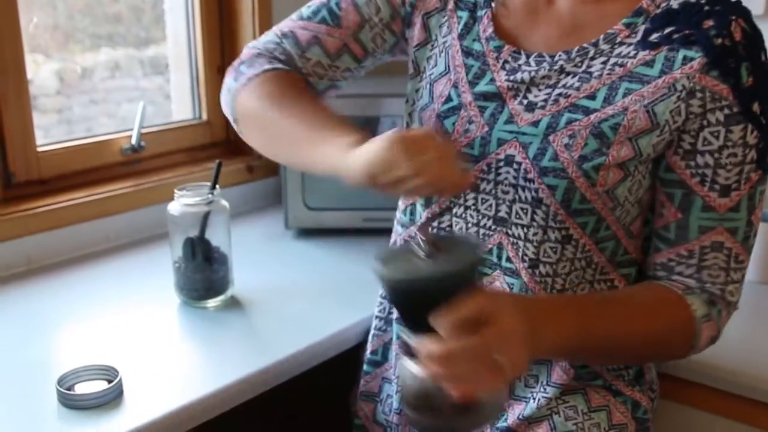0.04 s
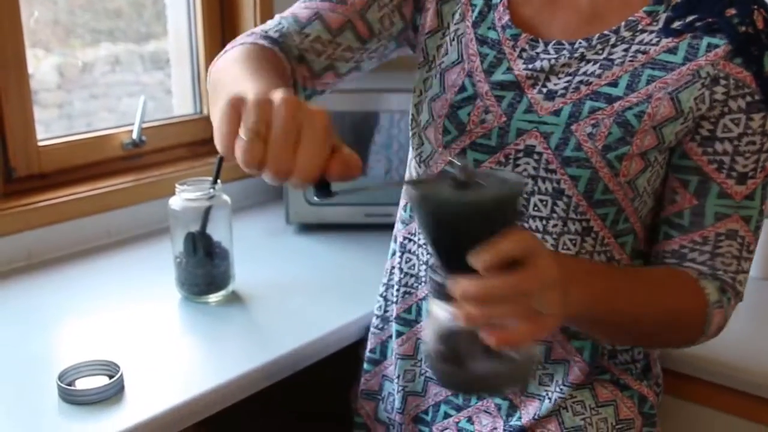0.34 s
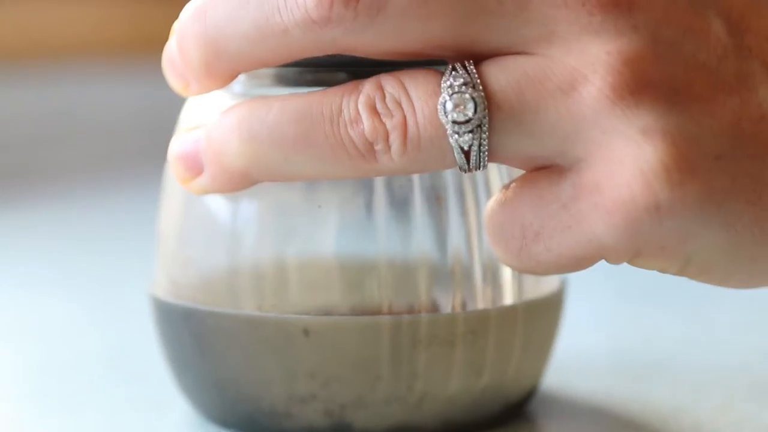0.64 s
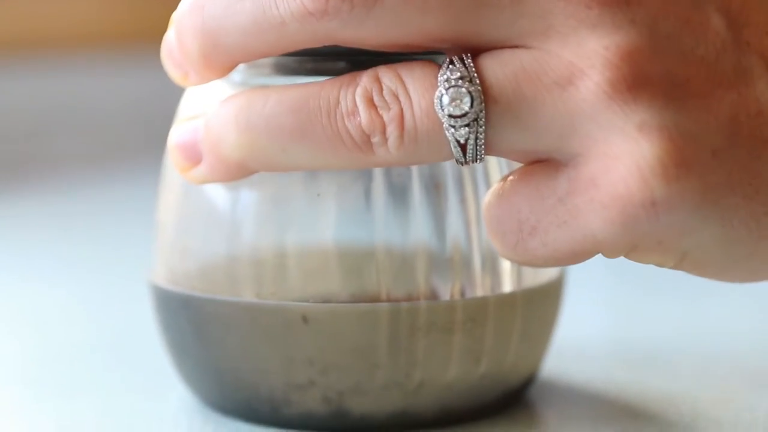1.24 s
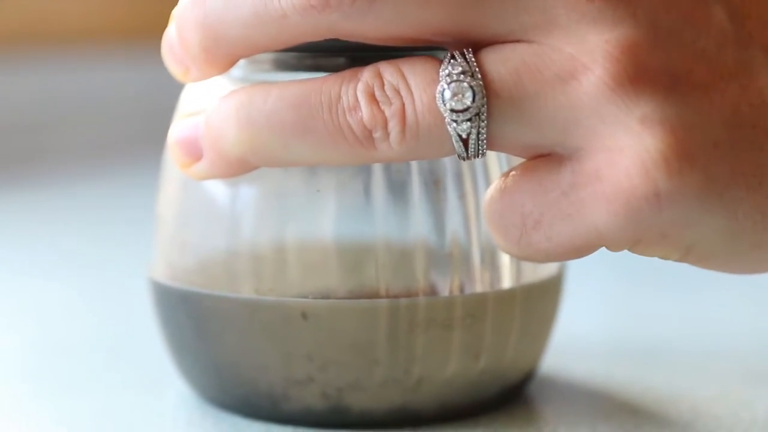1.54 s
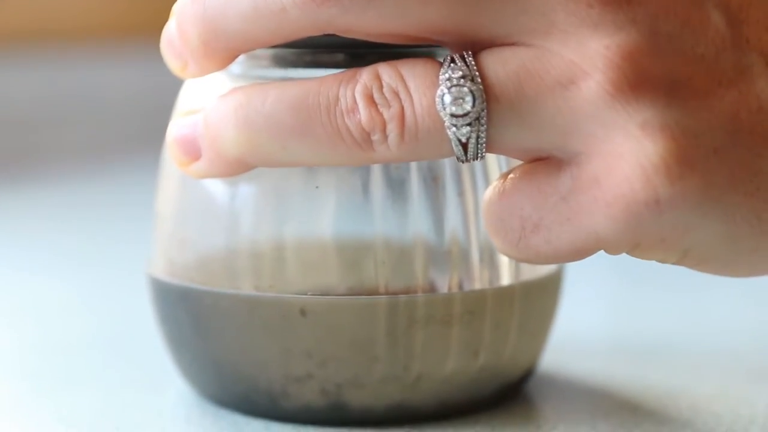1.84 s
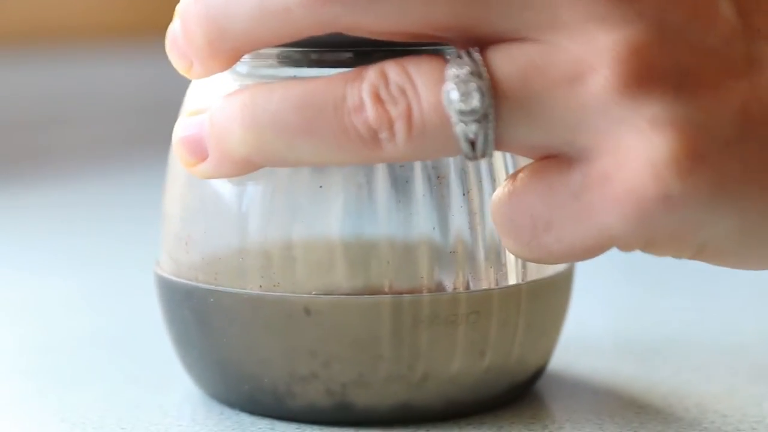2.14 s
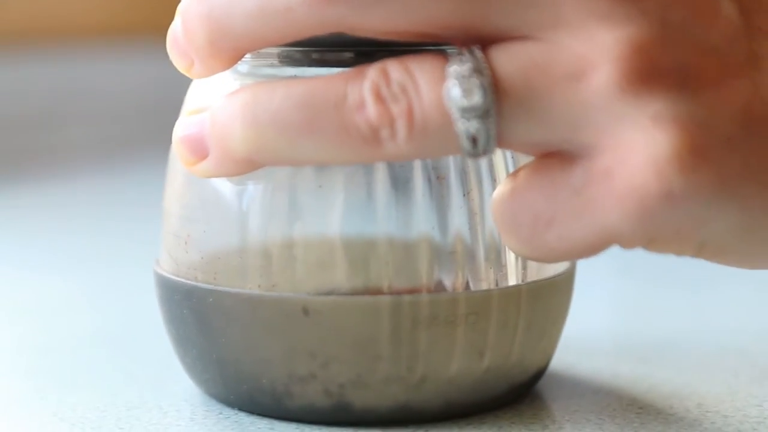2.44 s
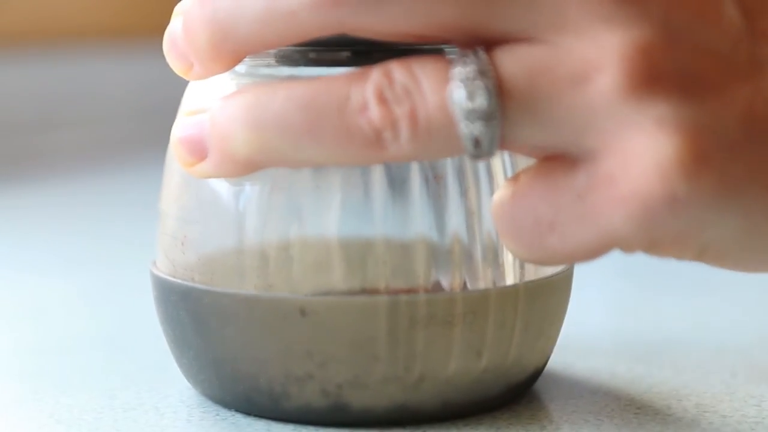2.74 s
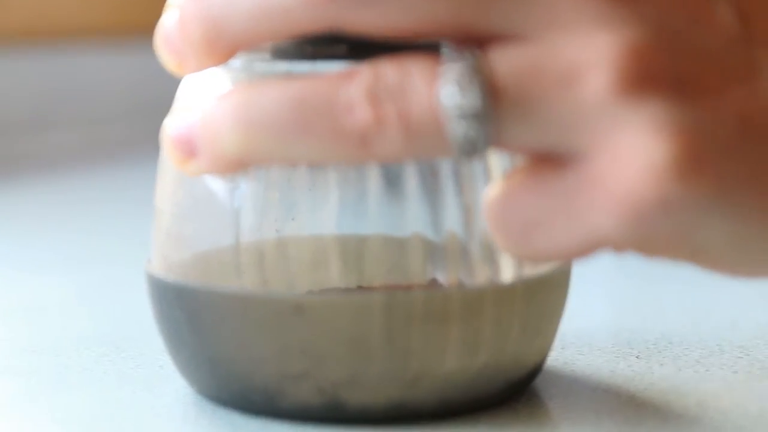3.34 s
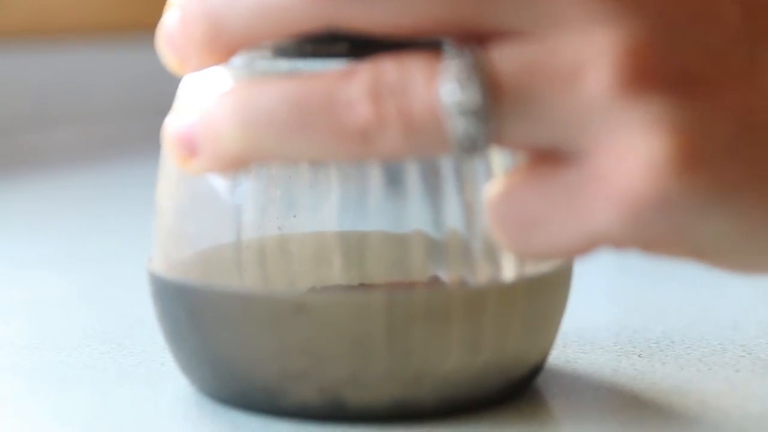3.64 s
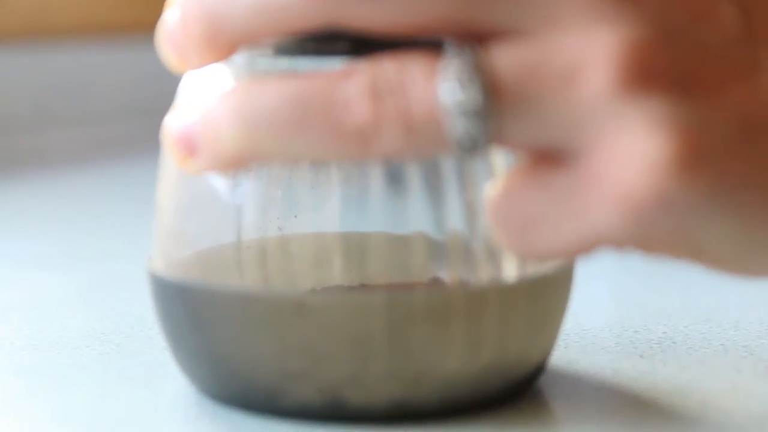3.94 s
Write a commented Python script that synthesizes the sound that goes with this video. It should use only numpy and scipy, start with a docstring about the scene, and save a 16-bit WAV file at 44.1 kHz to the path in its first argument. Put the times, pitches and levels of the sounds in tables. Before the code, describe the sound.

A hand-cranked coffee grinder rasps faintly across a kitchen, with grounds rustling brightly in a glass jar. After a brief silence at about 0.5 seconds, the grinding returns very close. Beans crunch and crack sharply over dull thuds of the crank, densest from 0.8 to 2.4 seconds. From about 2.7 seconds the crunching thins to scattered knocks, clicks and small scrapes of bean fragments until 4 seconds.

```python
"""A hand-cranked burr mill grinds coffee beans over a glass jar in a kitchen.
It is heard from across the room, with a bright rustle of grounds, then very close after a short silence.
Grit rasps between the burrs; beans crush and crack, ring the housing and spray splinters.
Fragments clink and scrape, the crank catches and thuds; the crunching thins as the beans run low."""
import sys
import numpy as np
from scipy import signal
from scipy.fft import rfft, irfft
from scipy.io import wavfile

SR = 44100
rng = np.random.default_rng(int(sys.argv[2]) if len(sys.argv) > 2 else 0)


def dump(signal):
    """Clip the signal to [-1, 1] and save it as 16-bit WAV at the path in sys.argv[1]."""
    limited = np.clip(np.atleast_2d(signal).T, -1, 1)
    pcm = np.round(limited * 32767).astype(np.int16)
    wavfile.write(sys.argv[1], SR, pcm)


N = 176400
TIME = np.arange(N) / SR
CLOSE_FROM_S, CUTOFF_HZ = 0.5596, 15750
GRIT_PER_S, FINE_GRAINS_PER_S, FRAGMENT_Q = 2100, 12000, 12


def from_db(db):
    """Decibels to gain."""
    return 10 ** (np.asarray(db) / 20)


def in_time(rows):
    """Columns of a curve at every sample."""
    times, *columns = np.transpose(rows)
    return [np.interp(TIME, times, column) for column in columns]


def coloured(x, points):
    """Minimum-phase filter of unit energy with the given spectrum."""
    size = 4096
    hz, db = np.transpose(points)
    shape_db = np.interp(np.log(np.fft.rfftfreq(size, 1 / SR) + 1), np.log(hz), db)
    cepstrum = irfft(np.log(from_db(shape_db)))[:size // 2]
    cepstrum[1:] *= 2
    impulse = irfft(np.exp(rfft(cepstrum, size)))
    return signal.fftconvolve(x, impulse[None] / np.linalg.norm(impulse), axes=-1)[:, :N]


def resonate(x, hz, width_hz):
    """One resonance of unit energy with steepened skirts."""
    radius = np.exp(-np.pi * width_hz / SR)
    peak = [1, 0, -1, 1, -2 * radius * np.cos(2 * np.pi * hz / SR), radius ** 2]
    octave_hz = [hz / np.sqrt(2), min(hz * np.sqrt(2), SR / 2 - 20)]
    sos = np.vstack([peak, signal.butter(2, octave_hz, "band", fs=SR, output="sos")])
    impulse = signal.sosfilt(sos, signal.unit_impulse(SR // 10))
    return signal.sosfilt(sos, x + 1e-18) / np.linalg.norm(impulse)


def grains(per_s, spread_db=3):
    """Random clicks, many small and a few large; rms 1."""
    hits = rng.random(N) < per_s / SR
    sizes = from_db(spread_db * np.minimum(rng.exponential(1, N), 3.5))
    clicks = hits * sizes * rng.choice([-1, 1], N)
    return clicks / clicks.std()


def contact(hz, scatter=1, stereo=1):
    """Strength of each click in each ear; the ears differ more in the treble."""
    width = min(stereo * 0.12 * hz / 1000, 1)
    mid, side = rng.standard_normal((2, N))
    return (1 + scatter * mid) / np.hypot(1, scatter) + width * side * [[1], [-1]]


def bursts(rows, release_s, attack_s=0.0013):
    """Sum of attack, hold, release envelopes."""
    return sum(from_db(db) * np.clip((TIME - start_s) / attack_s, 0, 1)
               * np.exp(-np.maximum(TIME - start_s - hold_s, 0) / release_s)
               for start_s, hold_s, db in rows)


def swell(peak_s, half_width_s):
    """Bell-shaped rise and fall in power."""
    return np.exp(-np.minimum(((TIME - peak_s) / half_width_s) ** 2, 100))


def drift(rate_hz):
    """Smooth random wandering of spread 1."""
    slow = signal.sosfilt(signal.butter(2, rate_hz, fs=SR, output="sos"), rng.standard_normal(N + SR))
    return slow[SR:] / slow[SR:].std()


# Distant mill envelope: (time [s], level [dB])
FAR_LEVEL = [(0, -30), (.074, -36.5), (.083, -26.5), (.11, -32.5), (.26, -36), (.33, -29.5), (.445, -39),
             (.47, -120)]
# Distant mill spectrum: (frequency [Hz], level [dB])
FAR_SPECTRUM = [(50, -58), (210, -23.5), (509, -17.5), (738, -1), (1450, -7.5), (1900, -5.5),
                (10700, -34.5), (15500, -61)]
def far_mill(grit):
    """Distant grinding, blurred by the room."""
    db, = in_time(FAR_LEVEL)
    side = signal.sosfilt(signal.butter(1, 3500, "high", fs=SR, output="sos"), rng.standard_normal(N))
    return from_db(db) * coloured(grit + side * [[1], [-1]], FAR_SPECTRUM)


# Crank catches: (time [s], hold [s], level [dB], pitch [Hz])
THUDS = [(0, 0.01, -43, 264), (0.665, 0.026, -32.5, 241), (0.823, 0.066, -41, 224),
         (0.997, 0.017, -38, 240), (1.179, 0.044, -36, 243), (1.356, .03, -43, 276),
         (1.817, 0.058, -41.5, 318), (2.079, 0.049, -39.5, 167), (2.294, 0.099, -39.5, 272),
         (3.261, 0.037, -45.5, 293)]
# Low mill resonances: (frequency [Hz], bandwidth [Hz], gain [dB])
LOW_MODES = [(154.3, 41, -13.5), (263.7, 16, -0.5), (318, 370, -4)]
def shudder(load, release_s=0.016, thud_width_hz=46, shake_db=3, rumble_db=-23.5):
    """Each catch of the crank thuds; catches and grinding load keep the whole mill rumbling."""
    rub = grains(FINE_GRAINS_PER_S)
    catches, out = np.zeros(N), np.zeros((2, N))
    for start_s, hold_s, db, hz in THUDS:
        catch = bursts([(start_s, hold_s, db)], release_s)
        out += resonate(rub * catch, hz, thud_width_hz)
        catches += catch
    shake = np.hypot(from_db(shake_db) * catches, from_db(rumble_db) * load)
    for hz, width_hz, db in LOW_MODES:
        out += from_db(db) * resonate(rub * shake * contact(hz), hz, width_hz)
    return out


# Slides of grounds: (time [s], hold [s], level [dB])
RUSTLES = [(.018, 0.043, -35), (.087, 0.0064, -34.5), (.198, 0.013, -41.5)]
# Rustle spectrum: (frequency [Hz], level [dB])
RUSTLE_SPECTRUM = [(2500, -40), (5500, 2), (10500, 0), (15500, -18)]
def rustle(grit):
    """Grounds slide in the glass jar."""
    hiss = coloured(grit * contact(hz=8040, stereo=0.75), RUSTLE_SPECTRUM)
    return bursts(RUSTLES, release_s=0.021) * hiss


# Burr drag: (time [s], level [dB], treble offset [dB])
DRAG = [(.57, -40.5, 7), (.65, -31.5, 1.5), (.87, -28, 1), (1.19, -24.5, -8.5), (1.29, -35.5, 7.5),
        (1.76, -32.5, -0.5), (2.03, -36, -2), (2.2, -28.5, 1.5), (2.42, -31.5, 5.5), (2.48, -40.5, -3),
        (2.56, -28, -3.5), (2.79, -43, -2), (3.25, -43, 9), (3.7, -49, -0.5), (4, -46.5, 2)]
def burr_drag():
    """Bass and treble envelopes of grit dragging between the burrs."""
    db, treble_db = in_time(DRAG)
    return from_db([db, db + treble_db]) * (TIME > CLOSE_FROM_S)


# Housing and jar resonances: (frequency [Hz], bandwidth [Hz], gain [dB])
BODY_MODES = [(678, 31, -15.5), (772, 186, -7.5), (968, 85, -4), (1244, 79, -7.5), (1707, 66, -11),
              (1904, 130, -7.5), (2416, 43, -6), (2639, 120, -10), (2832, 180, -4.5), (4122, 117, -12.5),
              (4420, 410, -14.5)]
def body_ring(grit, snaps, bass_load, treble_load, treble_from_hz=2150):
    """Grit and snaps ring the body; each mode wavers in level and pitch as contact points shift."""
    drift_hz, waver_db, pitch_share = 16.55, 3.5, 0.0099
    out = np.zeros((2, N))
    for hz, width_hz, db in BODY_MODES:
        load = treble_load if hz > treble_from_hz else bass_load
        waver = from_db(waver_db * np.clip(drift(drift_hz), -2, 2))
        waver /= np.sqrt(np.mean(waver ** 2))
        force = grit * load * waver * contact(hz) + snaps * contact(hz, scatter=0.17)
        ring = resonate(force, hz, width_hz)
        warped_s = TIME + drift(drift_hz) * pitch_share / (2 * np.pi * drift_hz)
        out += from_db(db) * np.array([np.interp(warped_s, TIME, ear) for ear in ring])
    return out


def splinters(drag, breaking, snaps, lowest_hz=5640, db_per_octave=-10.5):
    """Fine splinters spray from the beans, each ringing its own mix of high resonances."""
    spray = np.hypot(from_db(-22.5) * breaking, from_db(-29) * drag)
    chips = (grains(per_s=800) * spray + from_db(-23.5) * snaps) * contact(lowest_hz)
    out = np.zeros((2, N))
    for hz in np.geomspace(lowest_hz, CUTOFF_HZ, 26):
        gain = from_db(db_per_octave * np.log2(hz / lowest_hz))
        out += gain * resonate(chips * rng.uniform(-1.01, 1, N), hz, width_hz=89)
    return out


# Room tone spectrum: (frequency [Hz], level [dB])
ROOM_SPECTRUM = [(70, -25), (170, -0.5), (1500, -3), (15000, -33)]
def room_tone(level_db=-53):
    """Faint, nearly mono hush behind the close mill."""
    noise = rng.standard_normal(N) + 0.06 * rng.standard_normal((2, N))
    return from_db(level_db) * coloured(noise, ROOM_SPECTRUM) * (TIME > CLOSE_FROM_S)


def clink(grit, start_s, db, hz, rise_cycles=1.37, chatter_db=-14.5):
    """A struck fragment rings for a few cycles, then chatters on at the same pitch."""
    cycles = np.maximum(TIME - start_s, 0) * hz
    rise = np.minimum(cycles / rise_cycles, 100)
    ring = from_db(db) * rise * np.exp(1 - rise) * np.sin(2 * np.pi * cycles)
    chatter = grit * bursts([(start_s, 0, db + chatter_db)], release_s=0.023)
    return ring + resonate(chatter, hz, hz / FRAGMENT_Q)


# Bean cracks: (time [s], level [dB], pitch [Hz])
CRACKS = [(.775, -15, 897), (0.85, -14.5, 1005), (1.304, -13, 2610), (1.391, -12, 2060),
          (1.455, -9.5, 1000), (1.513, -7.5, 1880), (1.545, -11.5, 2430), (1.608, -13.5, 1280),
          (1.684, -14.5, 2550), (1.863, -10.5, 1240), (1.878, -11, 990), (2.065, -12.5, 2510),
          (2.449, -13, 1216), (2.615, -13, 770), (2.704, -20, 1010), (3.266, -19, 1060), (3.277, -16, 2930)]
def cracks(grit, snap_db=9.5, debris_db=-9.5):
    """Beans snap: force impulses, a debris envelope and the fragments' clinks."""
    snaps, debris, clinks = np.zeros((3, N))
    for start_s, db, hz in CRACKS:
        snaps[int(start_s * SR)] += from_db(db + snap_db)
        debris += bursts([(start_s, 0, db + debris_db)], release_s=0.007)
        clinks += clink(grit, start_s, db, hz)
    return snaps, debris, clinks


# Bean crushes: (peak time [s], half width [s], level [dB], treble offset [dB])
CRUSHES = [(0.883, 0.039, -21.5, -1), (1.06, 0.071, -24.5, 2), (1.187, 0.026, -26, 5.5),
           (1.411, 0.014, -25.5, -3), (1.463, 0.043, -22, -7.5), (1.581, 0.026, -25.5, -4),
           (1.838, 0.01, -24, 1), (1.884, 0.015, -21.5, -10), (2.078, 0.017, -23.5, -0.5),
           (2.109, 0.0056, -19.5, -1.5), (2.277, 0.013, -29.5, 4.5), (2.338, 0.014, -17, -9),
           (2.609, 0.051, -31.5, -18), (2.938, 0.015, -30.5, 4.5), (3.304, 0.014, -31.5, -2.5)]
def crushes():
    """Bass and treble envelopes of beans crumbling in swells of grains."""
    power = np.zeros((2, N))
    for peak_s, half_width_s, db, treble_db in CRUSHES:
        power += from_db([[db], [db + treble_db]]) ** 2 * swell(peak_s, half_width_s)
    return np.sqrt(power)


# Fragment scrapes: (peak time [s], half width [s], pitch [Hz], level [dB])
SCRAPES = [(2.238, 0.0068, 1895, -22.5), (2.41, 0.024, 5180, -36), (2.866, 0.018, 2670, -31),
           (3.133, 0.0085, 4000, -37.5), (3.205, 0.012, 2350, -32), (3.363, 0.006, 4030, -34),
           (3.473, 0.02, 952, -29.5), (3.575, 0.023, 1850, -34), (3.821, 0.04, 1810, -41.5),
           (3.985, 0.019, 662, -37)]
def scrapes(grit):
    """Fragments scrape along the burr, each at its own pitch."""
    out = np.zeros((2, N))
    for peak_s, half_width_s, hz, db in SCRAPES:
        friction = grit * np.sqrt(swell(peak_s, half_width_s)) * contact(hz)
        out += from_db(db) * resonate(friction, hz, hz / FRAGMENT_Q)
    return out


# Loose pieces: (time [s], level [dB], pitch [Hz])
KNOCKS = [(2.608, -7.5, 1850), (3.029, -11, 1320), (3.066, -15, 1810), (3.109, -16, 1290),
          (3.162, -13.5, 2620), (3.293, -11, 1790), (3.466, -15, 2700), (3.545, -17, 4280)]
def knocks(grit):
    """Pieces of bean knock against the burr without breaking."""
    return sum(clink(grit, start_s, db, hz) for start_s, db, hz in KNOCKS)


def close_mill(pan_db=0.5):
    """Drag and breaking beans load the burrs and sound the mill, slightly to the left."""
    grit = grains(GRIT_PER_S)
    snaps, debris, clinks = cracks(grit)
    bass_drag, treble_drag = burr_drag()
    bass_breaking, treble_breaking = np.hypot(crushes(), debris)
    bass_load = np.hypot(bass_drag, bass_breaking)
    treble_load = np.hypot(treble_drag, treble_breaking)
    out = shudder(bass_load) + body_ring(grit, snaps, bass_load, treble_load)
    out += clinks + scrapes(grit) + knocks(grit)
    out += splinters(treble_drag, treble_breaking, snaps)
    return out * from_db([[pan_db], [-pan_db]])


def kitchen_reverb(x, t60_s=0.093, predelay_s=0.003, level_db=-12):
    """Short diffuse tail, different in each ear."""
    t = TIME[:SR // 2]
    tail = rng.standard_normal((2, len(t))) * from_db(-60 * t / t60_s) * (t > predelay_s)
    tail /= np.linalg.norm(tail, axis=1, keepdims=True)
    return from_db(level_db) * signal.fftconvolve(x, tail, axes=-1)[:, :N]


def scene():
    """The far mill, a silence, then the close mill with its room."""
    mill = close_mill()
    hush = room_tone()
    fine_grit = grains(FINE_GRAINS_PER_S)
    return far_mill(fine_grit) + rustle(fine_grit) + mill + kitchen_reverb(mill) + hush


def record(dry):
    """Steep elliptic low-pass."""
    return signal.sosfilt(signal.ellip(10, .2, 80, CUTOFF_HZ, fs=SR, output="sos"), dry)


dry = scene()
out = record(dry)
dump(out)
```